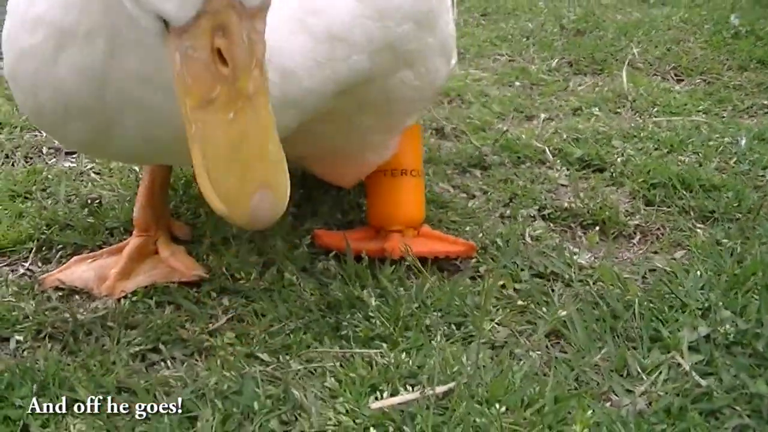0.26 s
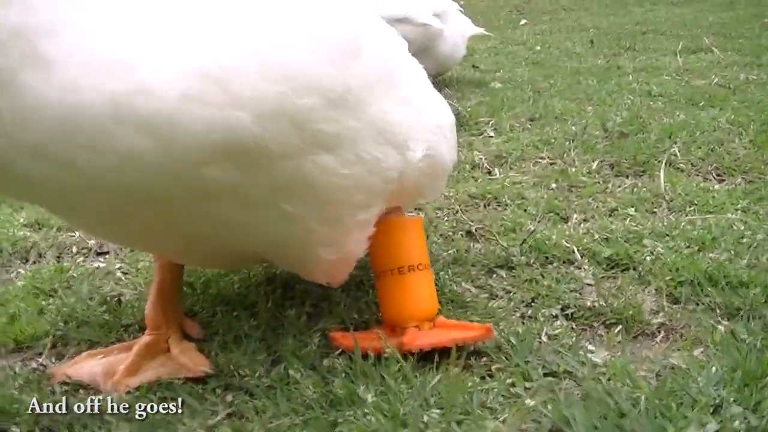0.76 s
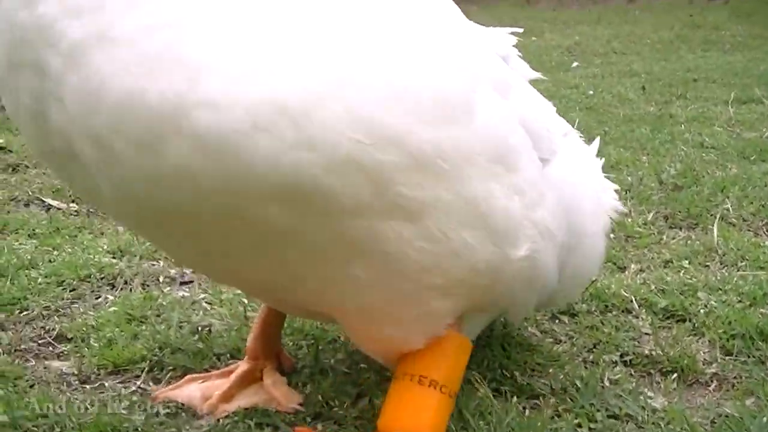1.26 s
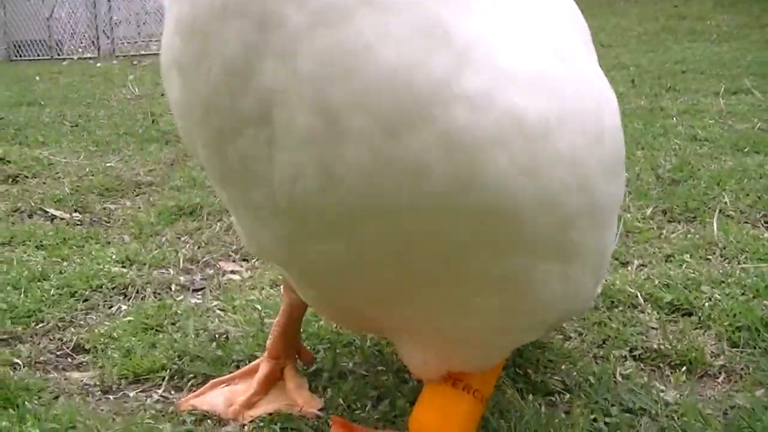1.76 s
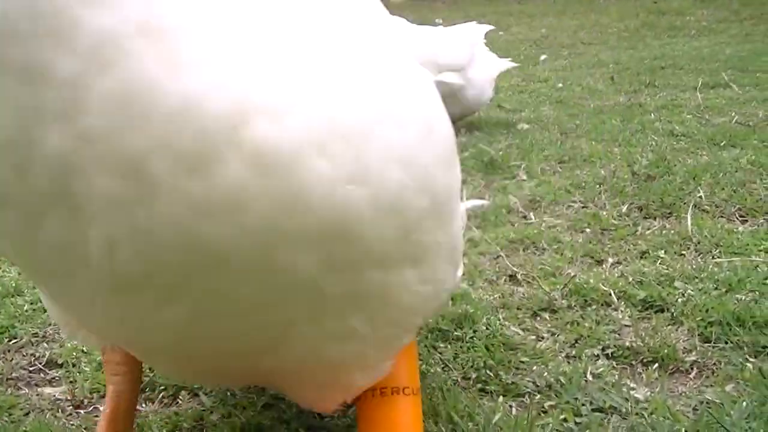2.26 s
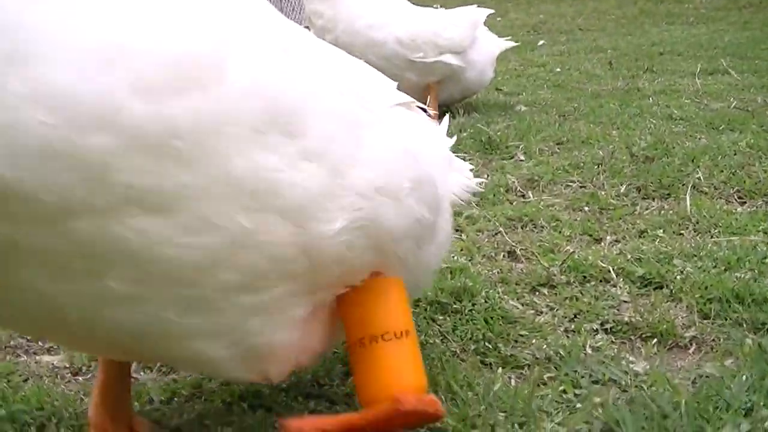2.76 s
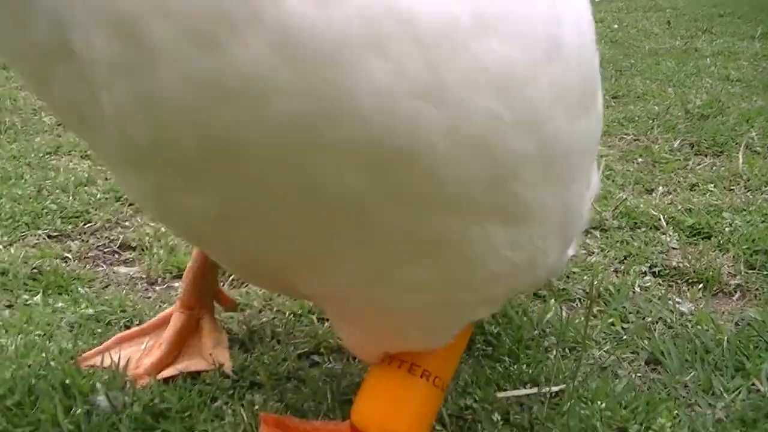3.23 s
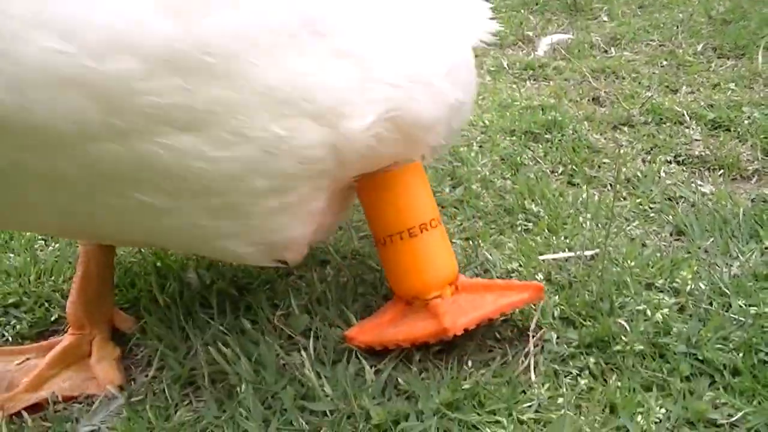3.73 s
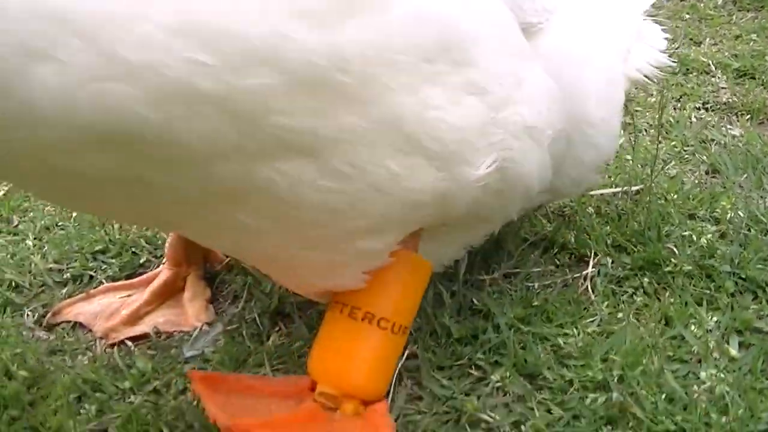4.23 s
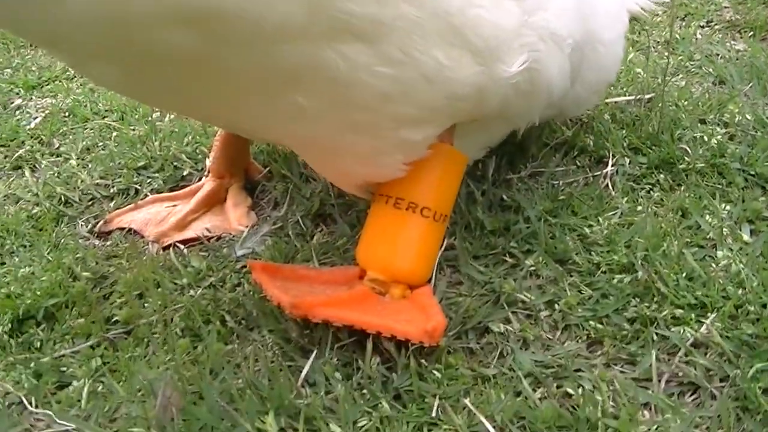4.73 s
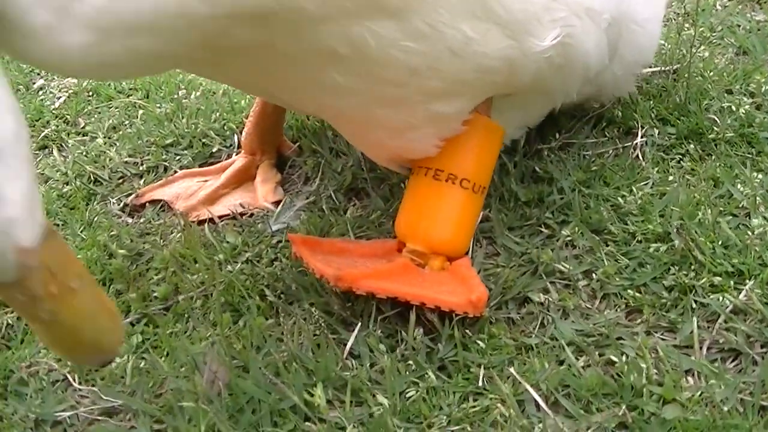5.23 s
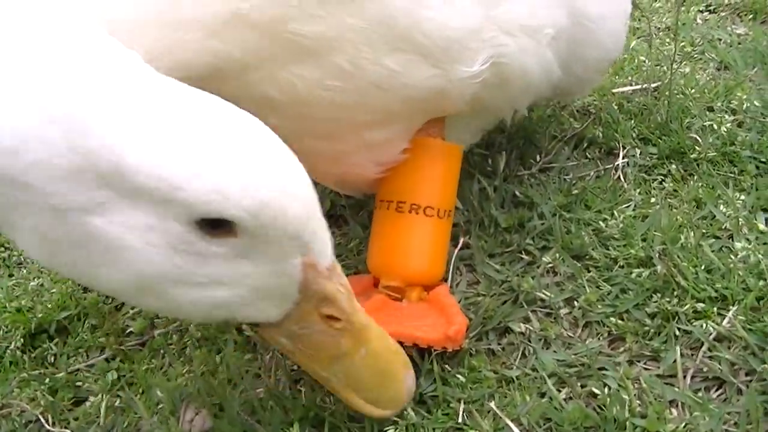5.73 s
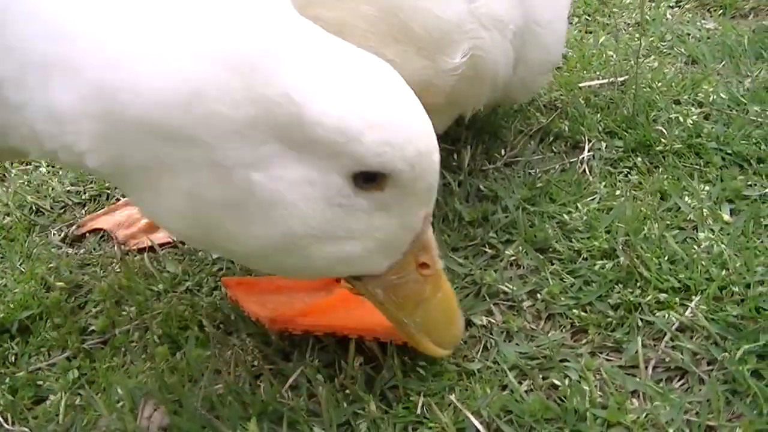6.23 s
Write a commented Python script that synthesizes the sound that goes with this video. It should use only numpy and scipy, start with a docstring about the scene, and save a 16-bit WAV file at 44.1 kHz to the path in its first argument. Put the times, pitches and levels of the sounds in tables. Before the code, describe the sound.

Close, dry, nearly mono pickup in an open grassy yard. A duck's nasal, buzzy quacks come in quick pairs for about four seconds, with woody bill clacks before them. Soft brushing, crisp grass ticks and light crackle fall between. A farther fowl moans in a rough double tone, tiny birds chirp downward, and after a pause come a single quack, nibbles, scuffs and two feeble quacks.

```python
"""Grassy yard: a domestic duck quacks close by, mostly in pairs, while another walks over the lawn.
Each quack is a rattle of about 70 bursts per second ringing one throat; a bill clack, a sum of
decaying sines, precedes most calls. Filtered noise grains swish and impulses tick in the grass;
nibbles and scuffs are ringing noise. A fowl further off whines with two beating tones, small birds
call in gliding sines, and filtered noise makes the outdoor hush."""
import sys
import numpy as np
from scipy import signal
from scipy.fft import rfft, irfft, next_fast_len
from scipy.io import wavfile
from scipy.ndimage import uniform_filter1d

SR = 44100
rng = np.random.default_rng(int(sys.argv[2]) if len(sys.argv) > 2 else 0)


def master(y):
    """Save y as 16-bit WAV."""
    cut = np.clip(np.atleast_2d(y).T, -1, 1)
    pcm = np.round(cut * 32767)  # scale
    wavfile.write(sys.argv[1], SR, pcm.astype(np.int16))


N = 286209


def amp(db):
    """Amplitude factor of a level in dB."""
    return 10 ** (np.asarray(db) / 20)


def unit_rms(x):
    """Scales x to unit RMS."""
    return x / np.sqrt(np.mean(x ** 2) + 1e-20)


def add(mix, start_s, sound):
    """Adds sound into mix in place, cut at the end of mix."""
    part = mix[max(round(start_s * SR), 0):][:len(sound)]
    part += sound[:len(part)]


def colour(x, points, tilt_db_per_octave=0):
    """Filters x by (frequency [Hz], gain [dB]) points, tilted above about 1 kHz."""
    points_hz, points_db = np.transpose(points)
    octave = np.log2(np.fft.rfftfreq(len(x), 1 / SR) + 1)
    gain_db = np.interp(octave, np.log2(points_hz), points_db)
    gain_db = gain_db + tilt_db_per_octave * np.maximum(octave - 10, 0)
    return irfft(rfft(x) * amp(gain_db), len(x))


def drift(n, hz):
    """Slow random wander of unit RMS: noise smoothed twice over 1 / hz."""
    size = int(SR / hz)
    smoothed = uniform_filter1d(rng.standard_normal(n), size)
    return unit_rms(uniform_filter1d(smoothed, size))


def ring(drive, hz, width_hz):
    """Doubled resonance: its response swells briefly, then dies away; unit RMS."""
    t = np.arange(len(drive)) / SR
    response = t * np.exp(-np.pi * width_hz * t) * np.sin(2 * np.pi * hz * t)
    return unit_rms(signal.fftconvolve(drive, response)[:len(t)])


# outdoor noise spectrum: (frequency [Hz], relative level [dB])
HUSH_SPECTRUM = [(30, -45), (100, -31), (200, -23), (300, -12.5), (540, -4), (820, -5.5), (1460, -9),
                 (2750, -11), (5450, -19.5), (9700, -32), (16000, -47.5)]


def hush(level_db=-53, swell_db=1.22, side_db=-20):
    """Distant outdoor noise, slowly swelling, nearly the same in both channels."""
    mid, side = (unit_rms(colour(rng.standard_normal(N), HUSH_SPECTRUM)) for _ in range(2))
    level = amp(level_db + swell_db * drift(N, 4.1))
    return level * (mid + amp(side_db) * np.array([side, -side]))


# grass noise spectrum: (frequency [Hz], gain [dB])
GRASS_SPECTRUM = [(200, -25), (800, -14.5), (2500, -0.5), (5000, -1), (10000, -3), (13000, -11),
                  (16000, -21.5)]
# feet and feathers brush grass: (middle [s], half length [s], level [dB], tilt [dB/octave])
SWISHES = [(0.229, 0.028, -44, -11), (0.399, 0.024, -35, -11.5), (0.903, 0.095, -55, -10.5),
           (1.5, 2.8, -63.5, -4), (1.996, 0.013, -46, -2.5), (2.931, 0.1, -47.5, -2.5),
           (3.398, 0.027, -53.5, -2.5), (3.601, 0.091, -47.5, -5), (4.023, 0.17, -46.5, -4.5),
           (5.375, 0.063, -54, -2.5), (5.58, 0.096, -54.5, -7), (5.916, 0.16, -54.5, -2)]


def swishes(grains_per_s=650, spread_db=8, smooth=0.92, clump_db=2.5):
    """Blades slip past each other: sparse grains plus smooth noise under a bell envelope."""
    out = np.zeros(N)
    for middle_s, half_s, db, tilt in SWISHES:
        t = np.arange(max(middle_s - 2 * half_s, 0), middle_s + 2 * half_s, 1 / SR)
        n = len(t)
        grains = (rng.random(n) < grains_per_s / SR) * rng.standard_normal(n)
        grains = grains * amp(spread_db * np.minimum(rng.exponential(1, n), 2))
        rub = unit_rms(grains) + smooth * rng.standard_normal(n)
        brush = unit_rms(colour(rub, GRASS_SPECTRUM, tilt))
        bell = np.exp(-((t - middle_s) / half_s) ** 2)
        add(out, t[0], amp(db + clump_db * drift(n, 110)) * brush * bell)
    return out


def crackle(per_s=14, db=-54, spread_db=4, fade_s=0.0017):
    """Bent blades spring back at random: tiny fading noise clicks."""
    clicks = rng.random(N) < per_s / SR
    clicks = clicks * amp(db + spread_db * np.minimum(rng.exponential(1, N), 3))
    t = np.arange(SR // 100) / SR
    click = rng.standard_normal(len(t)) * np.exp(-t / fade_s)
    return colour(signal.fftconvolve(clicks, click)[:N], GRASS_SPECTRUM)


# bill nibbles at grass: (time [s], level [dB], pitch [Hz])
NIBBLES = [(0.04, -47.5, 9300), (5.262, -48.5, 2550), (5.395, -53.5, 2670), (5.532, -49, 2530),
           (5.671, -51, 4000)]


def nibbles(swell_s=0.00051, damping=0.31):
    """Soft pips: each a tiny rub of the bill ringing at one pitch."""
    out, t = np.zeros(N), np.arange(SR // 50) / SR
    for start_s, db, hz in NIBBLES:
        rub = rng.standard_normal(len(t)) * t * np.exp(-t / swell_s)
        add(out, start_s, amp(db) * ring(rub, hz, damping * hz))
    return out


# bill modes: (nominal frequency [Hz], relative level [dB], t60 [s])
BILL_MODES = [(527, -41, 0.027), (926, 2, 0.043), (1260, 2, 0.021), (2206, -4.5, 0.032), (2820, 1.5, 0.01),
              (4730, -11, 0.021), (6000, -22, 0.015)]
# bill opens: (time [s], peak level [dB])
CLACKS = [(0.3367, -23), (1.067, -29.5), (1.6562, -19.5), (2.313, -22.5), (2.937, -20), (4.9831, -15),
          (5.752, -31.5)]


def clacks():
    """The bill parts with a hollow knock: decaying modes, slightly detuned each time."""
    out, t = np.zeros(N), np.arange(SR // 20) / SR
    for start_s, db in CLACKS:
        knock = np.zeros(len(t))
        for hz, mode_db, t60 in BILL_MODES:
            mode_hz = hz * rng.uniform(0.95, 1.038)
            knock += amp(mode_db - 60 * t / t60) * np.sin(2 * np.pi * mode_hz * t)
        add(out, start_s, amp(db) * knock / abs(knock).max())
    return out


# throat resonances: (nominal centre [Hz], width [Hz], level [dB], share of the tuning [exponent])
THROAT = [(923, 76, -8.5, 0.44), (1236.4, 162, 6, 0.58), (1485, 193, 4.5, 0.76), (1982, 167, 0.5, 0.28),
          (2427, 260, -8.5, 0.4)]
# air in a burst: (frequency [Hz], level [dB])
AIR_SPECTRUM = [(400, -46.5), (2800, -30.5), (4200, -49), (7500, -49.5), (11000, -68), (16000, -82.5)]


def throat(hz, tuning, gape_db, bite_db, nasal_db, bright_db, rasp_db, bright_hz,
           pipe_width_hz=217, top_ring_db=-12.5):
    """Gain at hz: throat resonances, upper two lifted by gape and bite; five windpipe rings; air."""
    power = 0
    for (centre, width, db, share), lift_db in zip(THROAT, (0, 0, 0, gape_db, bite_db)):
        offset = 2 * (hz - centre * tuning ** share) / width
        power = power + amp(db + lift_db) ** 2 / (1 + offset ** 2) ** 2
    # two nasal, one bright, two rasp rings above it
    rings_hz = (3186, 3800, bright_hz, bright_hz * 1.16, bright_hz * 1.39)
    rings_db = (nasal_db, nasal_db, bright_db, rasp_db, rasp_db + top_ring_db)
    for centre, db in zip(rings_hz, rings_db):
        power = power + amp(db) ** 2 / (1 + (2 * (hz - centre) / pipe_width_hz) ** 2) ** 1.54
    air_hz, air_db = np.transpose(AIR_SPECTRUM)
    return np.sqrt(power + amp(np.interp(np.log(hz + 1), np.log(air_hz), air_db)) ** 2)


def burst(voice, open_db, slide, rough=0.57, rough_top=0.77, puff_s=0.0016, rasp_s=0.0027,
          sweep_s=.002, sweep_hz=1100, glide_per_db=0.0018, scatter=0.016, suddenness=0.5):
    """Membrane builds up in low resonances, then snaps open: puff and longer rasp sweep upward.

    A nearly shut bill lowers and muffles it.
    """
    size = 2048
    t, hz = np.arange(size) / SR, abs(np.fft.fftfreq(size, 1 / SR))
    # 0 below sweep_hz, 1 from an octave above
    high = np.clip(np.log2(hz / sweep_hz + 1e-9), 0, 1) ** 2
    stretch = 1 + slide + glide_per_db * open_db + scatter * rng.standard_normal()
    gain = throat(hz / stretch, *voice) * amp(open_db * np.sqrt(high))
    # suddenness: 0 = zero phase, 1 = minimum phase
    log_gain = signal.hilbert(np.log(gain))
    body = np.exp(log_gain.real - 1j * suddenness * log_gain.imag)[:size // 2 + 1]
    high = high[:len(body)]

    def noise(fade_s):
        """Spectrum of noise that swells and fades."""
        swell = t * np.exp(-t / fade_s)
        return rfft(unit_rms(rng.standard_normal(size) * swell)) / np.sqrt(size)

    puff, rasp = noise(puff_s), noise(rasp_s)
    noise_share = np.clip(rough + (rough_top - rough) * high, 0, 1)
    drive = np.sqrt(1 - noise_share)
    drive = drive + np.sqrt(noise_share * (1 - high)) * puff + np.sqrt(noise_share * high) * rasp
    # delays the highs by up to sweep_s
    sweep = np.exp(-2j * np.pi * np.cumsum(sweep_s * high) * SR / size)
    centred = np.fft.fftshift(irfft(drive * body * sweep))
    return unit_rms(centred * signal.windows.tukey(size))


# quacks: (first full burst [s], length [s], mean burst rate [1/s], relative crest level [dB],
#   first burst re crest [dB], last burst re crest [dB], throat tuning [factor], gape lift [dB],
#   bite lift [dB], nasal rings [dB], bright ring [dB], rasp rings [dB], bright ring pitch [Hz])
QUACKS = [(.384, .087, 68.35, -14, -8.5, -4.5, 1.15, 8, -12, -15, -16, -22.5, 4780),
          (0.574, 0.048, 75.7, -9.5, -11.5, -2, 1.2, -1, 4.5, -22.5, -12.5, -30, 4670),
          (1.101, 0.079, 70.6, -11.5, -11.5, -4, 1.016, -10, -2, -47, -35, -24, 4710),
          (1.29, 0.048, 74.65, -11, -4, -0.5, 1.016, -2.5, 2.5, -28, -24.5, -24, 4400),
          (1.688, 0.13, 71.6, -10, -6, -5.5, 0.9, 8.5, 5, -32, -25, -18, 4690),
          (2.362, 0.138, 68.2, -10, -3, -15, 1.02, 0.5, 3.5, -28.5, -16.5, -21.5, 4680),
          (2.583, 0.056, 75.9, -10, -5, -2.5, 1.03, .5, 8, -21, -22, -16.5, 4460),
          (2.965, 0.1263, 70.47, -10, -5.5, -16, .93, 5, 3.5, -25.5, -30, -26, 4650),
          (3.136, 0.064, 77.3, -8.5, -8, -5, 0.97, 4.5, 2.5, -19, -14, -26, 4440),
          (3.772, 0.09, 69.58, -13, -6, -6.5, 1.017, -12, -0.5, -39, -25, -24.5, 4480),
          (3.953, 0.063, 75.2, -12, -8, -7, 1.005, -8.5, 3, -21, -18, -41, 4400),
          (5.012, 0.075, 72.9, -12, -4, -7, 1.103, 0, -1.5, -18, -21, -29, 4703),
          (5.8, 0.1, 64.9, -17, -8.5, -5.5, 0.986, -6.5, -9, -23.5, -20.5, -26, 4600),
          (5.971, 0.059, 68.6, -20, -7.5, -6.5, 1, -5, 7, -12.5, -16.5, -27, 4740)]


def quacks(lead_s=.001, hurry_s=.0004, jitter_s=.0003, shimmer_db=1.17, level_db=-12.5,
           shut_db=-17, flow_db=-23, flow_s=0.013, bore_cut_hz=700,
           rise_power=2, fade_power=1.26, stutter_db=-17.5, slide=0.017):
    """Burst trains swell, hurry mid-call and fade; bill opens and shuts, resonances sink."""
    out = np.zeros(N)
    for start_s, length_s, rate, crest_db, first_db, last_db, *voice in QUACKS:
        steps = round(length_s * rate)
        # one feeble extra burst as the membrane starts and one as it stops
        for k in range(-1, steps + 2):
            u = np.clip(k / steps, 0, 1)
            edge = abs(2 * u - 1)
            effort_db = first_db * edge ** rise_power if u < .5 else last_db * edge ** fade_power
            open_db = shut_db * (edge ** 2 - .3) + 2 * rng.standard_normal()
            if not 0 <= k <= steps:
                effort_db += stutter_db
            at_s = start_s - lead_s + k / rate
            at_s += hurry_s * np.sin(2 * np.pi * u) + jitter_s * rng.standard_normal()
            sound = burst(voice, open_db, slide * (.5 - u))
            burst_db = level_db + crest_db + effort_db + shimmer_db * rng.standard_normal()
            add(out, at_s - len(sound) / SR / 2, amp(burst_db) * sound)
        # air hums in the main resonance before, during and after the rattle
        t = np.arange(-.05, length_s + 0.074, 1 / SR)
        outside_s = np.maximum(np.maximum(-t, t - length_s), 0)
        hum = ring(rng.standard_normal(len(t)), *THROAT[1][:2])
        add(out, start_s + t[0], amp(crest_db + flow_db) * np.exp(-outside_s / flow_s) * hum)
    # narrow throat passes little below its lowest resonance
    return signal.sosfilt(signal.butter(2, bore_cut_hz, "highpass", fs=SR, output="sos"), out)


# breaking stalk: (frequency [Hz], gain [dB])
SNAP_SPECTRUM = [(900, -9), (1800, 19.5), (7000, 7), (10500, 0.5), (14000, -24)]
# stalks snap and tick: (time [s], crack level before the snap filter [dB])
TICKS = [(0.703, -33.5), (.822, -31), (0.8755, -22), (0.907, -20.5), (0.916, -26), (.935, -26.5),
         (2.0945, -24), (2.118, -19), (2.137, -20.5), (2.1465, -24.5), (2.737, -29), (3.8124, -32),
         (4.0172, -19.5), (6.077, -36.5), (6.395, -29.5)]


def ticks(tail_db=-17, tail_s=0.0019):
    """Stalk breaks: one sharp crack and a splintery noise tail."""
    out, t = np.zeros(N), np.arange(SR // 50) / SR
    for start_s, db in TICKS:
        splinters = amp(tail_db) * rng.standard_normal(len(t)) * np.exp(-t / tail_s)
        add(out, start_s, amp(db) * ((t == 0) + splinters))
    return colour(out, SNAP_SPECTRUM)


# dull scuffs on the turf: (time [s], relative level [dB], fade time constant [s])
SCUFFS = [(.855, -49, 0.031), (5.75, -42.5, 0.027), (5.83, -49, 0.24), (6.478, -40.5, .03)]


def scuffs(turf_hz=560, turf_width_hz=420, attack_s=0.00075, cut_hz=300):
    """Foot or bill presses into turf: a soft low thud of damped, ringing noise."""
    out, t = np.zeros(N), np.arange(SR // 3) / SR
    for start_s, db, fade_s in SCUFFS:
        envelope = np.minimum(t / attack_s, 1) * np.exp(-t / fade_s)
        thud = ring(rng.standard_normal(len(t)), turf_hz, turf_width_hz)
        add(out, start_s, amp(db) * envelope * thud)
    return signal.sosfilt(signal.butter(3, cut_hz, "highpass", fs=SR, output="sos"), out)


# nasal rings: (ratio to the lower tone [factor], relative level [dB])
NASAL_RINGS = [(3.36, -2), (3.802, -5)]
# side tones: (multiple of the beat above the lower tone [factor], relative level [dB])
WHINE_SIDES = [(2, -19.5), (-1, -24.5), (3, -15)]
# two-toned whines: (start [s], length [s], nominal lower tone [Hz], late pitch arch [Hz],
#   mean beat [Hz], level [dB], upper re lower tone mid-note [dB], nasal ring re lower tone [dB])
WHINES = [(1.325, .29, 724, -11.5, 138, -43.5, 4.5, -40), (3.878, 0.57, 721, -4, 129.5, -42.5, -8, -10.5),
          (4.35, .37, 708.4, 61.5, 74.5, -46, 2.5, -5)]


def whines(waver=0.01, tiring_per_s=2.4, beat_waver=0.062, flutter_db=-0.5, nasal_width_hz=170,
           hoarse=0.96, opening_s=0.055, sag_hz_per_s=15, droop_hz=80, droop_s=0.0288,
           overshoot_hz=44.5, overshoot_at_s=0.0469, attack_s=0.039, release_s=0.085, handover_db=10):
    """Two membranes sing close together and beat; a hoarse nasal ring half follows the pitch."""
    out = np.zeros(N)
    for start_s, length_s, mid_hz, arch_hz, beat_hz, db, upper_db, nasal_db in WHINES:
        t = np.arange(0, length_s, 1 / SR)
        n, u = len(t), t / length_s
        # pitch scoops past its mark, sinks slowly, then drops as the air runs out
        hz = mid_hz + arch_hz * np.sin(np.pi * u ** 2) - sag_hz_per_s * (t - length_s / 2)
        hz = hz - droop_hz * np.exp((t - length_s) / droop_s)
        hz = hz + overshoot_hz * np.exp(-(2 * t / overshoot_at_s - 2) ** 2)
        # shakier with time from the onset of the second whine
        tired = 1 + tiring_per_s * (start_s + t - WHINES[1][0]).clip(0)
        low = 2 * np.pi * np.cumsum(hz * (1 + waver * tired * drift(n, 110))) / SR
        beat = 2 * np.pi * np.cumsum(beat_hz * (1 + beat_waver * drift(n, 140))) / SR
        # upper tone gains handover_db on the lower over the note
        handover = amp(handover_db * (u - .5) / 2)
        sides = sum(amp(side_db) * np.sin(low + round(m) * beat) for m, side_db in WHINE_SIDES)
        tone = np.sin(low) / handover + amp(upper_db) * handover * np.sin(low + beat)
        tone = tone + amp(upper_db / 2) * sides
        nasal = np.zeros(n)
        for ratio, ring_db in NASAL_RINGS:
            phase = ratio * (low + 2 * np.pi * mid_hz * t) / 2
            nasal += amp(ring_db) * (1 + hoarse * drift(n, nasal_width_hz)) * np.sin(phase)
        opening = np.minimum(t / opening_s, 1)
        voice = np.sqrt(2) * tone + amp(nasal_db) * opening * unit_rms(nasal)
        envelope = np.minimum(t / attack_s, 1) * np.minimum((length_s - t) / release_s, 1)
        add(out, start_s, amp(db + flutter_db * drift(n, 60)) * envelope * voice)
    return out


# small birds: (start [s], length [s], start pitch [Hz], end pitch [Hz], peak level [dB])
WHISTLES = [(2.594, .12, 3750, 3040, -51), (3.278, 0.12, 3863, 3100, -55), (4.17, 0.18, 1720, 1524, -56.5),
            (4.616, 0.094, 3900, 3060, -49), (4.73, .03, 1876, 2194, -48.5),
            (4.739, 0.22, 1930, 1560, -56.5)]


def whistles(waver=0.0072):
    """Thin, wavering sines that glide quickly, mostly down, and level off."""
    out = np.zeros(N)
    for start_s, length_s, start_hz, end_hz, db in WHISTLES:
        u = np.linspace(0, 1, int(length_s * SR))
        hz = end_hz + (start_hz - end_hz) * (1 - u) ** 2
        hz = hz * (1 + waver * drift(len(u), 200))
        add(out, start_s, amp(db) * np.sin(np.pi * u) * np.sin(2 * np.pi * np.cumsum(hz) / SR))
    return out


def yard(x, near_db=-13, near_t60=0.069, far_db=-33, far_t60=0.34, turf_cut_hz=1300):
    """Quick scatter from ground and bodies, then an open-air tail; turf soaks up echo treble."""
    t = np.arange(SR // 2) / SR

    def scatter(db, t60):
        """Decaying noise echo of unit energy, scaled by db."""
        tail = rng.standard_normal(len(t)) * (t > .002) * amp(-60 * t / t60)
        return amp(db) * tail / np.linalg.norm(tail)

    echo = scatter(near_db, near_t60) + scatter(far_db, far_t60)
    dull_echo = signal.lfilter(*signal.butter(1, turf_cut_hz, fs=SR), echo)
    return x + signal.fftconvolve(x, dull_echo)[:N]


def scene(side_db=-27, bill_cut_hz=420):
    """Sources nearly straight ahead; the two channels differ slightly in phase."""
    # small bill and thin stalks radiate little bass
    no_bass = signal.butter(3, bill_cut_hz, "highpass", fs=SR, output="sos")
    birds = yard(quacks() + clacks() + whistles())
    small = signal.sosfilt(no_bass, birds + ticks() + nibbles() + swishes())
    fowl = yard(whines(), far_db=-9, far_t60=0.52, turf_cut_hz=5000)
    mono = small + fowl + scuffs() + crackle()
    side = amp(side_db) * signal.hilbert(mono, next_fast_len(N))[:N].imag
    return mono + np.array([side, -side]) + hush()


def record(dry, edge_hz=15800):
    """Linear-phase lowpass that limits the band."""
    lowpass = signal.firwin(511, edge_hz, window=("kaiser", 9), fs=SR)
    return signal.oaconvolve(dry, lowpass[None], "same")


dry = scene()
out = record(dry)
master(out)
```